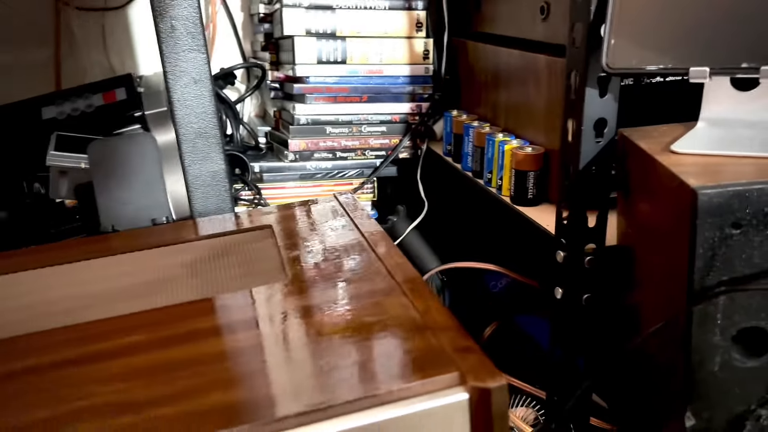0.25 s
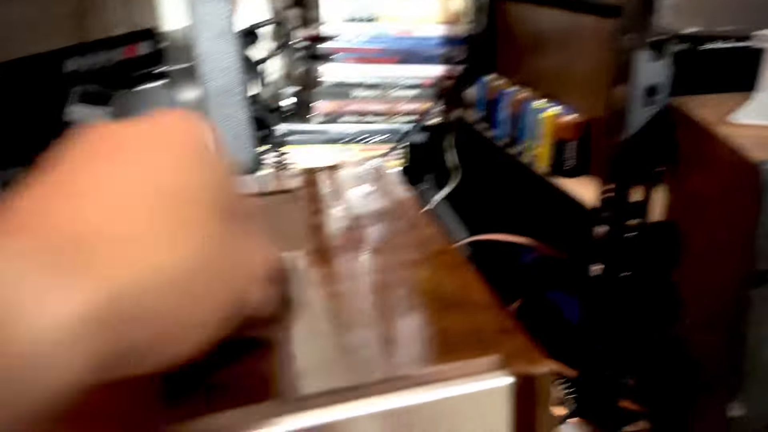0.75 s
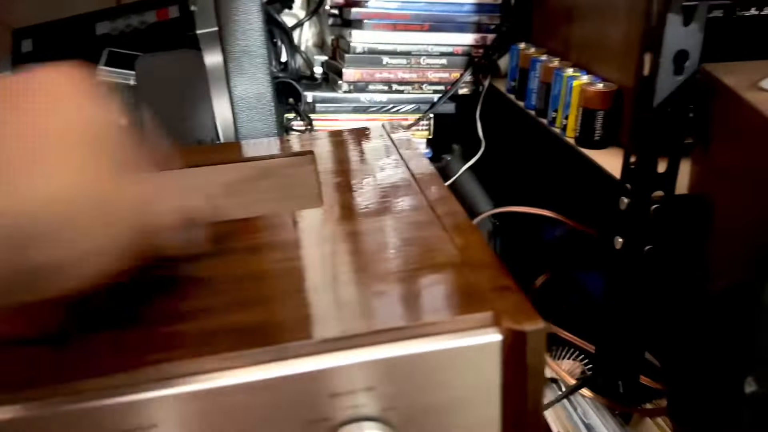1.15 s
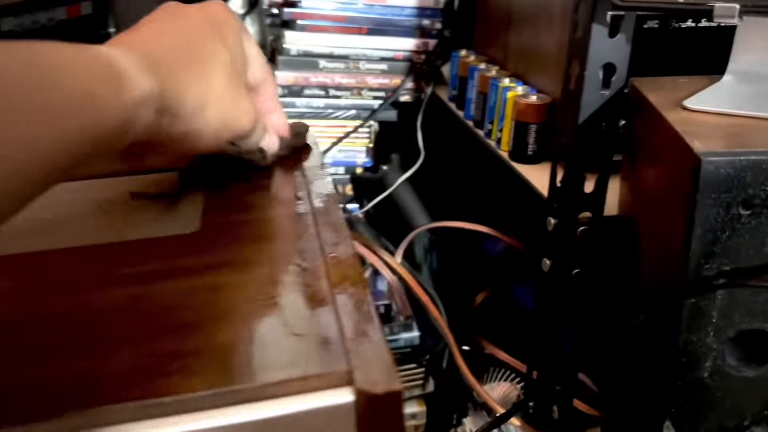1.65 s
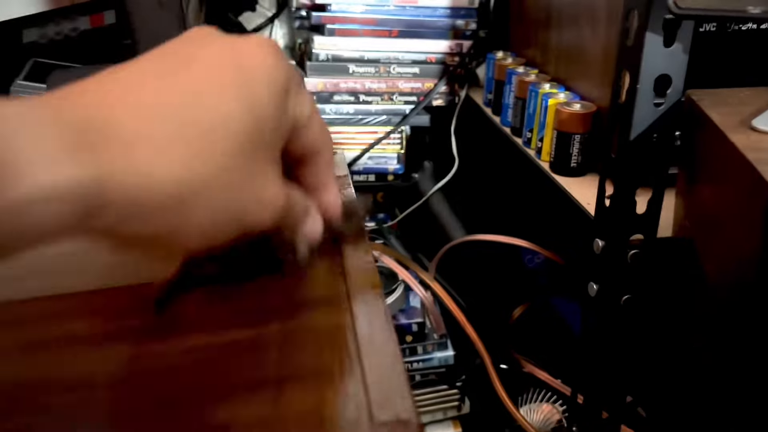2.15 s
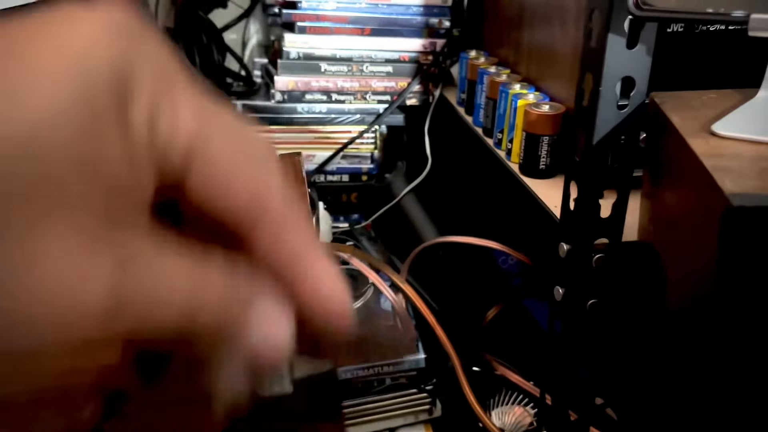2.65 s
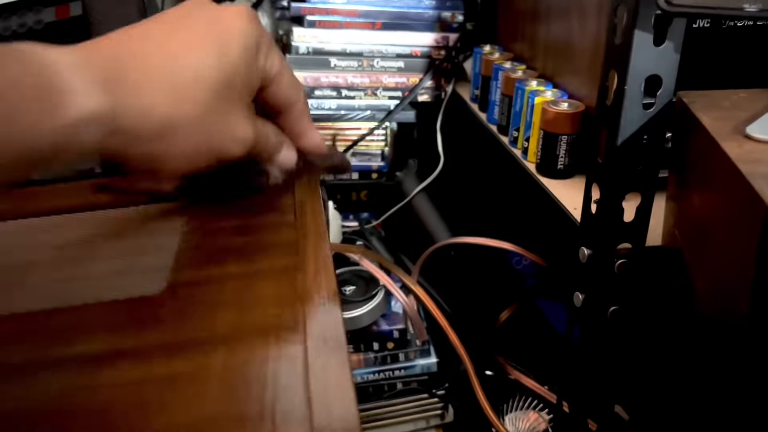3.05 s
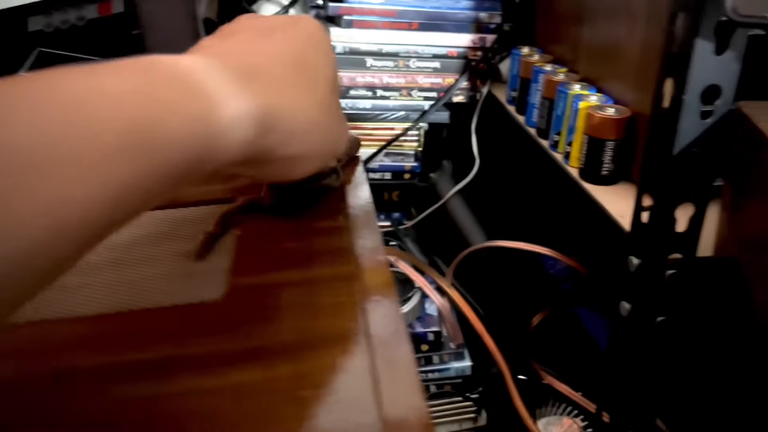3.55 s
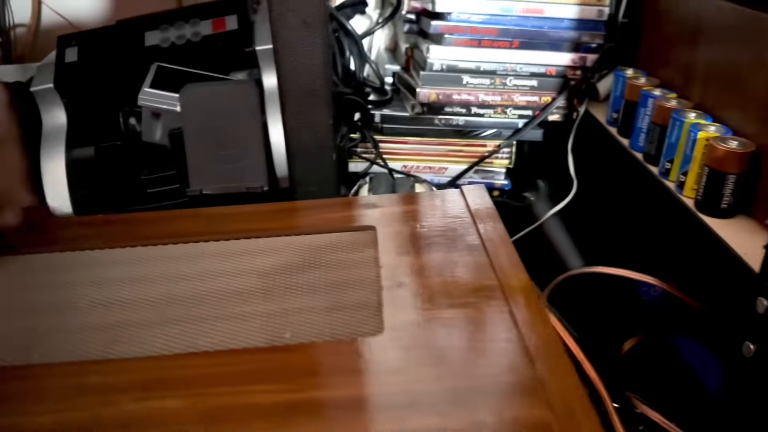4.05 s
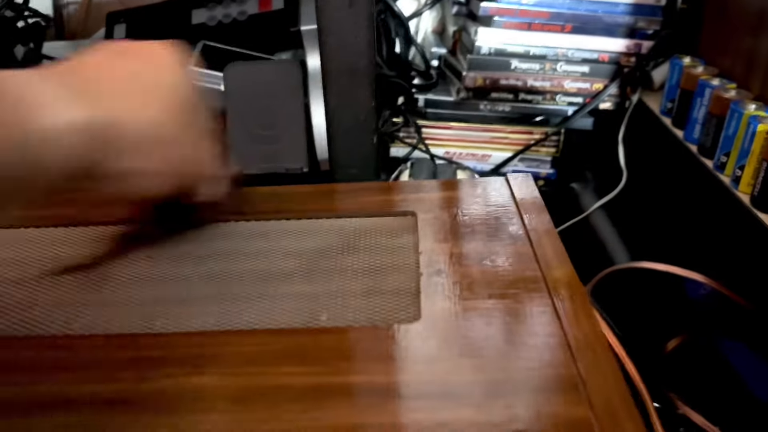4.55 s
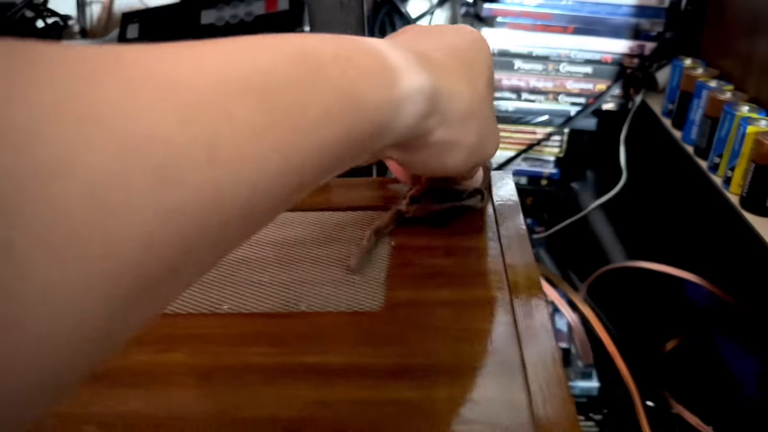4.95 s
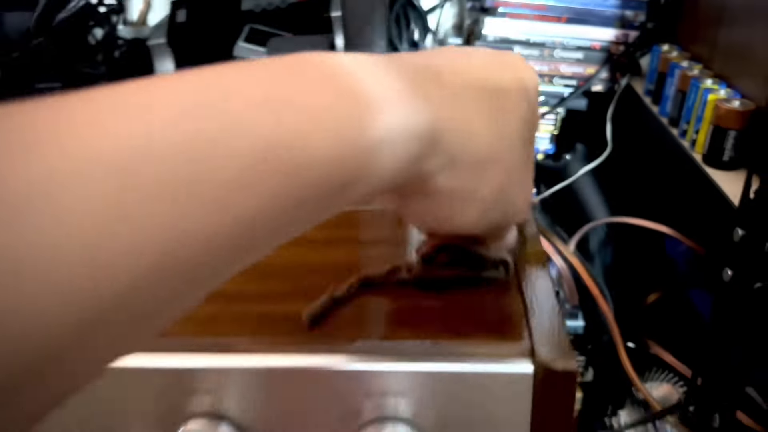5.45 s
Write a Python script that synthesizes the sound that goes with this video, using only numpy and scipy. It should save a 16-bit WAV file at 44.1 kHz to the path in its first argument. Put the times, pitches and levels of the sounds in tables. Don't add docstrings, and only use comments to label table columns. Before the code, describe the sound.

Close, brisk wiping of polished wood: airy fabric swishes, then woodier rubs with small thumps and damp squeaks in a quiet room.

```python
import sys
import numpy as np
from scipy import signal
from scipy.fft import rfft, irfft, next_fast_len
from scipy.io import wavfile
from scipy.ndimage import uniform_filter1d

SR = 44100
rng = np.random.default_rng(int(sys.argv[2]) if len(sys.argv) > 2 else 0)


def put_to_file(sound):
    columns = np.atleast_2d(sound).T
    safe = np.clip(columns, -1, 1)
    whole_steps = np.round(safe * 32767)
    wavfile.write(sys.argv[1], SR, whole_steps.astype(np.int16))


def undo_db(level):
    steps = np.asarray(level, float) / 20
    return 10 ** steps


N = 251811
TIME = np.arange(N) / SR
MS = np.arange(0, N / SR + .002, .001)

# (frequency [Hz], width [Hz], level [dB])
BOX = [(224.4, 32, -10), (338, 20.5, 0.5), (414, 46, -2.5), (475, 91, -5), (670, 40, -7), (694, 63, -14)]
# (frequency [Hz], width [Hz], level [dB])
PANEL = [(949, 94, 0), (1059.5, 8.3, 7.5), (1183, 108, 1.5), (1425, 116, -1), (1602, 85, -2.5),
         (1790, 166, -2.5), (2180, 470, -3.5), (2660, 134, -0.5), (3000, 160, -4.5)]


def rubbing():
    # (start [s], length [s], hiss [dB], fizz over hiss [dB], share of the stroke spent speeding up [0-1])
    strokes = [(-0.1, 0.37, -50.5, 1.5, 0.57), (0.245, 0.42, -48, 0, 0.61), (0.668, 0.32, -49.5, 1.5, 0.59),
               (0.997, 0.33, -48, 2, 0.29), (1.321, .39, -49, -1.5, 0.55), (1.728, 0.27, -44.5, -1.5, 0.7),
               (1.99, 0.38, -45.5, -3.5, 0.3), (2.345, 0.36, -52.5, -39, 0.31),
               (2.708, 0.45, -49, -10, 0.52), (3.134, 0.18, -75, -39, 0.26),
               (3.314, 0.26, -63.5, -19, 0.13), (3.381, 0.15, -55.5, -22, 0.53),
               (3.522, 0.041, -77, -29, 0.86), (3.576, 0.37, -50.5, -9.5, 0.2),
               (3.844, 0.43, -50, -7.5, 0.6), (4.257, 0.09, -64, -39, 0.9),
               (4.331, 0.484, -44, -13.5, 0.46), (4.787, 0.077, -70, -18, .2),
               (4.912, 0.095, -68, -26, 0.69), (4.986, 0.077, -58.5, -15, 0.46),
               (5.05, 0.13, -81, -24, 0.34), (5.134, 0.59, -49, -10, 0.45)]
    # (middle [s], length [s], panel [dB], box [dB])
    leans = [(.14, 0.21, -76, -67.5), (0.498, 0.34, -95, -61.5), (0.891, 0.15, -93, -61),
             (1.141, 0.26, -95, -58), (1.308, 0.067, -67, -62.5), (1.583, 0.26, -53, -61),
             (1.866, 0.19, -50, -50.5), (1.986, 0.19, -54.5, -54), (2.272, 0.25, -60, -60),
             (2.55, 0.72, -58, -59), (3, 0.34, -56, -64.5), (3.114, 0.12, -54.5, -59),
             (3.46, 0.31, -56.5, -61), (3.805, 0.5, -59, -57.5), (4.056, 0.38, -53.5, -50),
             (4.188, 0.24, -53.5, -60.5), (4.246, 0.12, -69, -55), (4.448, 0.23, -43, -53),
             (4.526, 0.11, -49.5, -43.5), (4.616, 0.21, -46.5, -49.5), (4.762, 0.22, -61.5, -58.5),
             (5.04, 0.27, -66, -69), (5.244, 0.28, -66, -61.5), (2.1, 0.24, -82, -63),
             (1.68, 0.12, -64, -64), (3.206, 0.23, -80, -75.5), (4.325, 0.11, -65, -64),
             (4.849, 0.11, -74, -74), (5.104, 0.08, -82, -75), (5.48, 1, -61, -60)]
    # (frequency [Hz], level [dB])
    hiss_spectrum = [(1200, -28), (2300, -15), (3200, -5.5), (5000, -2), (6000, -2.5), (7000, -9),
                     (8300, -5.5), (9900, -10.5), (11300, -52), (13500, -14.5), (15500, -15.5),
                     (16500, -59)]
    # (frequency [Hz], level [dB])
    fizz_spectrum = [(7000, -20.5), (8500, -1), (9700, 4), (10500, 5), (11500, -3), (13000, 4), (14500, 1),
                     (15700, 3), (16500, -72.5)]

    arches = [(speed(s, length, rising), undo_db(db), undo_db(fizz_db))
              for s, length, db, fizz_db, rising in strokes]
    hiss = undo_db(0.5) * sum(gain * v ** 0.49 for v, gain, _ in arches)
    fizz = undo_db(6.5) * sum(gain * bright * v ** 1.08 for v, gain, bright in arches)
    light = sum(gain * v ** 0.19 for v, gain, _ in arches)

    panel = undo_db(-12.5) * light + swells((s, length, db) for s, length, db, _ in leans)
    box = undo_db(-24.5) * light + swells((s, length, db) for s, length, _, db in leans)
    hiss, fizz, panel, box = (np.interp(TIME, MS, layer) for layer in (hiss, fizz, panel, box))

    fine = slips(grain_db=2.2, clump_db=0.5, clump_s=0.004)
    panel_slips = slips(grain_db=4.0, clump_db=2.5, clump_s=0.081)
    box_slips = slips(grain_db=3, clump_db=2.5, clump_s=0.015)
    cloth = hiss * coloured(fine, hiss_spectrum) + fizz * coloured(fine, fizz_spectrum)
    return cloth + panel * evened(ring(panel_slips, PANEL)) + box * evened(ring(box_slips, BOX))


def speed(start, length, rising):
    rising = np.clip(rising, 0.1, 0.9)
    phase = np.interp(MS, start + length * np.array([0, rising, 1]), [0, 0.5, 1])
    return np.sin(np.pi * phase).clip(0, 1) * (MS < start + length)


def swells(events):
    return sum(undo_db(db) * speed(s - length / 2, length, 0.46) ** 2 for s, length, db in events)


def slips(grain_db, clump_db, clump_s):
    sizes = undo_db(grain_db * np.minimum(rng.exponential(1, (2, N)), 6))
    clumps = undo_db(clump_db * wander(clump_s, N))
    return evened(rng.standard_normal((2, N)) * sizes * clumps)


def ring(x, modes):
    rung = 0
    for k, (hz, width, db) in enumerate(modes):
        rung = rung + (-1) ** k * undo_db(db) * signal.lfilter(*signal.iirpeak(hz, hz / width, SR), x)
    return signal.lfilter(*signal.butter(2, 2 * modes[-1][0], fs=SR), rung)


def pockets():
    # (start [s], length [s], first centre [Hz], last centre [Hz], level [dB])
    folds = [(1.808, 0.13, 1040, 1260, -41), (1.839, 0.18, 1770, 1960, -44), (1.947, 0.24, 1950, 2150, -51),
             (2.198, 0.62, 2150, 2010, -55.5), (3.166, .14, 2060, 2110, -68),
             (4.261, 0.22, 4200, 3760, -61), (4.488, 0.25, 2350, 2600, -47.5),
             (4.592, .12, 3330, 3280, -44), (4.98, 0.069, 3350, 3200, -59.5),
             (5.251, 0.62, 1940, 2080, -57), (5.297, 0.3, 4070, 4180, -56)]
    edge_db = -1.5
    paths = [[(s, hz, db + edge_db),
              (s + length / 2, (hz + last_hz) / 2, db),
              (s + length, last_hz, db + edge_db)]
             for s, length, hz, last_hz, db in folds]
    return sum(moving(rows, width=550, wobble=0.03, flutter_db=1.8, clear=0) for rows in paths)


def squeaks():
    # (time [s], pitch [Hz], level [dB])
    squeak_paths = [
        [(3.37, 5200, -64), (3.43, 5100, -61), (3.5, 5400, -66)],
        [(3.59, 4950, -60), (3.7, 5250, -58), (3.74, 5950, -54), (3.98, 6050, -55), (4.06, 6380, -53),
         (4.11, 6300, -54), (4.165, 5600, -53), (4.225, 5450, -53), (4.25, 6100, -58)],
        [(4.255, 6100, -55), (4.31, 6450, -66), (4.355, 6150, -55)],
    ]
    return undo_db(-2.2) * sum(moving(rows, width=280, wobble=0.016, flutter_db=3, clear=1.5)
                           for rows in squeak_paths)


def moving(rows, width, wobble, flutter_db, clear):
    s, hz, db = np.transpose(rows)
    on = slice(int(s[0] * SR), int(s[-1] * SR))
    t = TIME[on]
    hz = np.interp(t, s, hz) * (1 + wobble * wander(0.004, len(t)))
    noise = rng.standard_normal((2, len(t)))
    fuzzy = evened(resonate(resonate(noise, hz, width), hz, width))
    tone = evened(fuzzy + clear * np.sin(2 * np.pi * np.cumsum(hz) / SR))
    level = undo_db(np.interp(t, s, db) + flutter_db * wander(0.035, len(t)))
    fade_s = 0.012
    out = np.zeros((2, N))
    out[:, on] = tone * level * signal.windows.tukey(len(t), min(2 * fade_s * SR / len(t), 1))
    return out


def knocks():
    # (time [s], peak level [dB], struck note [Hz], brightness [dB], 60 dB decay [s])
    hits = [(1.011, -61, 2420, 4, 0.04), (1.041, -40.5, 2230, 16, 0.033), (1.272, -37, 1210, -7, 0.026),
            (1.509, -36, 1250, -1, 0.055), (1.736, -58, 1200, 2, 0.036), (2.51, -37, 2140, -16, 0.051),
            (2.578, -33, 385, -6, 0.031), (3.117, -30.5, 342, -12, 0.014), (3.326, -37.5, 583, -21, 0.2),
            (3.586, -43.5, 1390, -4, 0.13), (3.997, -33, 320, -11, 0.04), (4.017, -30.5, 308, -9, 0.11),
            (4.098, -30, 336, -17, 0.1), (4.388, -31.5, 1110, -10, 0.1), (4.468, -53, 1070, -9, 0.04),
            (4.509, -52, 326, -11, 0.045), (4.529, -36, 331, -10, 0.036), (4.656, -24.5, 2560, -19, 0.11),
            (4.806, -44, 353, -13, 0.047), (5.053, -36, 345, -20, 0.035), (5.267, -36, 720, -15, 0.22),
            (5.296, -38.5, 690, -10, 0.062)]
    size = 4000
    out, force, t = np.zeros((2, N)), np.zeros((2, N)), TIME[:size]
    for s, db, hz, bright_db, t60 in hits:
        puff = rng.standard_normal((2, size))
        on = slice(round(s * SR), round(s * SR) + size)
        fade = undo_db(db - 60 * t / max(t60, 0.005))
        attack = np.minimum(t / 0.002, 1)
        spot = evened(resonate(resonate(puff, hz, 400), hz, 400)) * attack
        tick = resonate(puff, 6000, 5000) * undo_db(-60 * t / 0.0091)
        out[:, on] += fade * (undo_db(-10.5) * spot + undo_db(bright_db - 7) * tick)
        force[:, on] += fade * puff
    rung = out + ring(force, PANEL) + undo_db(1) * ring(force, BOX)
    return signal.sosfilt(signal.butter(3, 240, "high", fs=SR, output="sos"), rung)


def ports(pair):
    # (time [s], 1 = far along the line of the ports and 0 = facing both,
    # share of direct sound [ratio])
    place = [(0, 1, 1.15), (1.72, 1, 1.15), (1.8, 0, 1.15), (2.2, 0, 1.05), (2.35, 0, .85), (2.65, 0, .85),
             (2.75, 1, .9), (2.95, 1, 1.15), (3.1, 1, 1), (3.2, 1, .75), (5.05, 1, .75), (5.15, .12, .8),
             (5.71, .12, .8)]
    # (frequency [Hz], lead [rad])
    far_points = [(0, 0), (350, .6), (650, 1.9), (900, 3), (2300, 6.3), (3250, 9.4), (6000, 18.9)]
    # (frequency [Hz], lead [rad])
    near_points = [(0, 1), (2400, -0.47), (3300, 2.5), (5300, 8.5), (7000, 9.5)]
    # (frequency [Hz], lead [rad])
    cavity_points = [(8200, 18.85), (10500, 15.9), (12000, 15.6), (13500, 12.7), (15000, 12.55),
                     (15500, 11.7), (16000, 11.5)]
    # (frequency [Hz], left-right likeness [0-1])
    likeness_points = [(100, 0.81), (330, 0.99), (650, 0.82), (920, 0.2), (1400, 0.76), (2000, 0.61),
                       (3300, 0.56), (4500, 0.14), (7000, 0.69), (8500, 0.63), (10500, 0.83), (12000, 0.91),
                       (12800, 0.21), (14000, 1)]
    # (frequency [Hz], left minus right [dB])
    balance_points = [(200, 4), (350, 0.5), (900, 4), (1400, -4), (2000, -1.5), (4400, -1), (7500, 2),
                      (9000, -1), (15000, 0)]
    # (time [s], delay [ms], depth [dB])
    shelf = [(0, .62, 2.5), (.27, .8, 3), (.67, .6, 3), (.92, .76, 3.5), (1.05, .76, 3.5), (1.32, .58, 3),
             (1.45, .58, 0), (5.71, .58, 0)]

    hz, t, (a, b) = signal.stft(pair, SR, nperseg=512, noverlap=384)
    s, far, direct = np.transpose(place)
    far, direct = np.interp(t, s, far), np.interp(t, s, direct)
    far_lead = np.interp(hz, *np.transpose(far_points + cavity_points))[:, None]
    near_lead = np.interp(hz, *np.transpose(near_points + cavity_points))[:, None]

    power = np.where(hz[:, None] < 9500, direct ** -3, 0.7)
    steady = np.clip(read(likeness_points, hz), 0.01, 1)[:, None] ** power
    likeness, lead, balance, colour = (patches(a.shape, 4, 40) for _ in range(4))
    same = np.clip(steady + 0.8 * (1 - steady) * likeness, 0, 1)
    lead = far * far_lead + (1 - far) * near_lead + 2.6 * (1 - steady) * lead
    right = same * a * np.exp(-1j * lead) + np.sqrt(1 - same ** 2) * b

    s, delay_ms, depth_db = np.transpose(shelf)
    comb = np.cos(2 * np.pi * np.outer(hz, np.interp(t, s, delay_ms) / 1000))
    comb_band = np.exp(-((hz[:, None] - 9500) / 2200) ** 2)
    right *= undo_db(comb_band * np.interp(t, s, depth_db) * comb)

    tilt = undo_db(read(balance_points, hz)[:, None] / 2 + 3 * (1 - steady) * balance)
    both = np.array([a * tilt, right / tilt]) * undo_db(1.4 * colour)
    return signal.istft(both, SR, nperseg=512, noverlap=384)[1][:, :N]


def patches(shape, bins, frames):
    field = uniform_filter1d(rng.standard_normal(shape), int(bins), axis=0)
    return evened(uniform_filter1d(field, int(frames), axis=1))


def fan():
    # (frequency [Hz], level [dB], left port's lead [rad])
    fan_tones = [
        (68.5, -64.5, 1.45),
        (241, -76, .4),
    ]
    out = np.zeros((2, N))
    for hz, db, lead in fan_tones:
        turn = 2 * np.pi * np.cumsum(hz * (1 + 0.0245 * wander(0.0793, N))) / SR
        level = np.sqrt(2) * undo_db(db + 2.5 * wander(0.1, N))
        out += level * np.sin(turn - np.array([[0], [lead]]))
    return out


def room():
    # (frequency [Hz], level [dB])
    room_spectrum = [(25, -12), (60, 0), (120, -8), (250, -12), (500, -24), (1000, -30), (3000, -31),
                     (6000, -32), (7500, -38), (9500, -36), (11500, -50), (15800, -52)]
    # (frequency [Hz], level [dB])
    rumble_spectrum = [(15, -40), (30, -16), (50, 0), (70, -25), (100, -60), (300, -130)]
    # (frequency [Hz], level [dB])
    thrum_spectrum = [(40, -60), (80, -2), (120, 0), (180, -4), (280, -40), (700, -130)]
    # (middle [s], rumble [dB], thrum [dB])
    jolts = [(.25, -70, -82), (.68, -67, -81), (.89, -72, -75), (1.32, -81, -72), (1.84, -68, -55.5),
             (2.02, -63, -64), (2.32, -67, -66.5), (2.65, -62, -65), (3.12, -69, -68), (3.78, -57, -74),
             (3.95, -67, -76), (4.1, -66, -66.5), (5.58, -78, -72)]
    jolt_s = 0.25
    air, shake = rng.standard_normal((2, 2, N))
    rumble = undo_db(-78) + swells((s, jolt_s, db) for s, db, _ in jolts)
    thrum = undo_db(-75.5) + swells((s, jolt_s, db) for s, _, db in jolts)
    rumble, thrum = np.interp(TIME, MS, rumble), np.interp(TIME, MS, thrum)
    return (undo_db(-72) * coloured(air + 0.12 * air[::-1], room_spectrum)
            + rumble * coloured(shake, rumble_spectrum)
            + thrum * coloured(shake + 0.36 * shake[::-1], thrum_spectrum))


def evened(x):
    return x / np.sqrt(np.mean(x ** 2) + 1e-20)


def wander(seconds, count):
    size = max(int(seconds * SR), 1)
    return evened(uniform_filter1d(uniform_filter1d(rng.standard_normal(count), size), size))


def read(points, hz):
    f, value = np.transpose(points)
    return np.interp(np.log(hz + 1), np.log(f + 1), value)


def coloured(x, points):
    size = next_fast_len(N)
    gain = undo_db(read(points, np.fft.rfftfreq(size, 1 / SR)))
    return evened(irfft(rfft(x, size) * gain, size)[..., :N])


def resonate(x, hz, width):
    turn = np.exp(2j * np.pi * np.cumsum(hz * np.ones(x.shape[-1])) / SR)
    r = np.exp(-np.pi * width / SR)
    return 2 * (turn * signal.lfilter([1 - r], [1, -r], x / turn)).real


def scene():
    return ports(rubbing() + pockets() + squeaks() + knocks()) + fan() + room()


def roll_off(x):
    return signal.sosfilt(signal.butter(12, 17010, fs=SR, output="sos"), x)


def record(dry):
    return roll_off(dry)


dry = scene()
out = record(dry)
put_to_file(out)
```